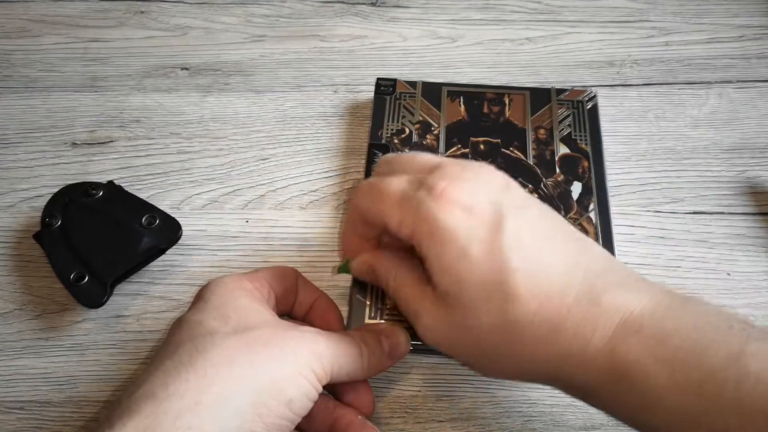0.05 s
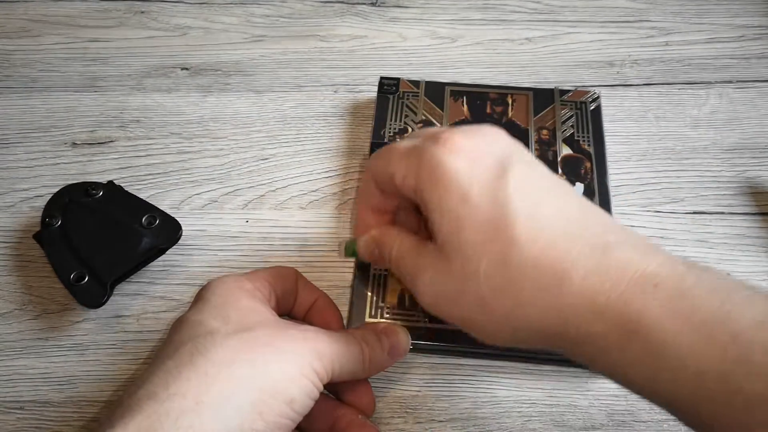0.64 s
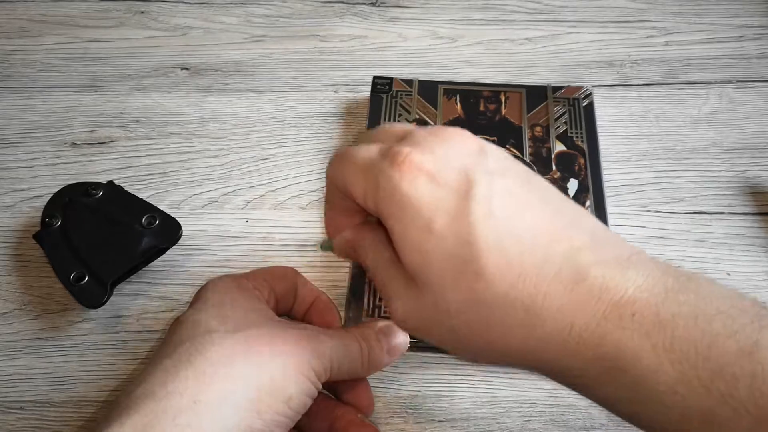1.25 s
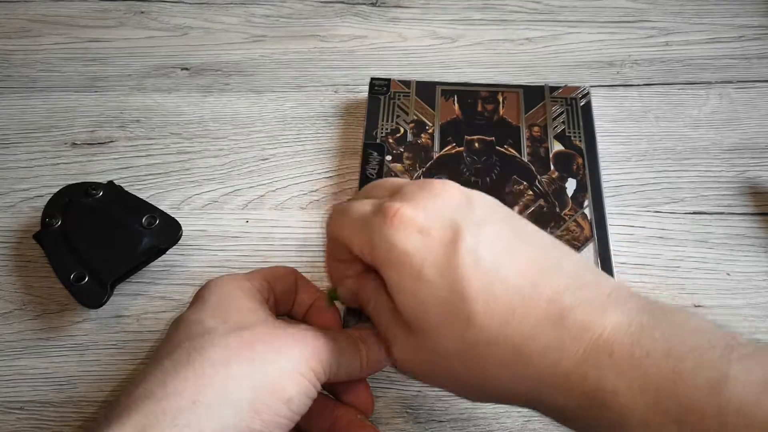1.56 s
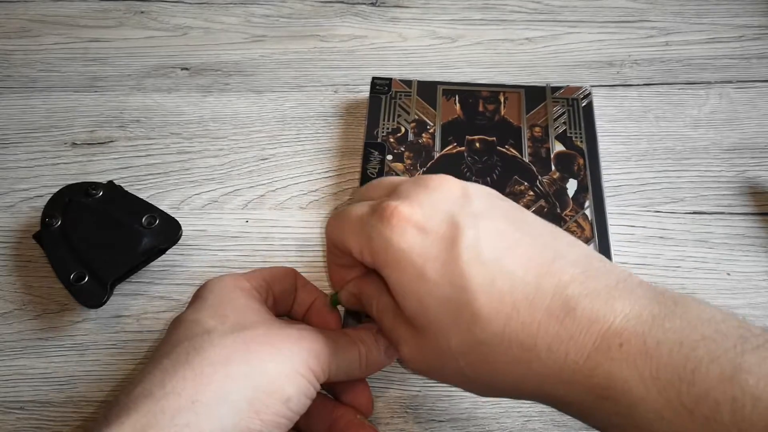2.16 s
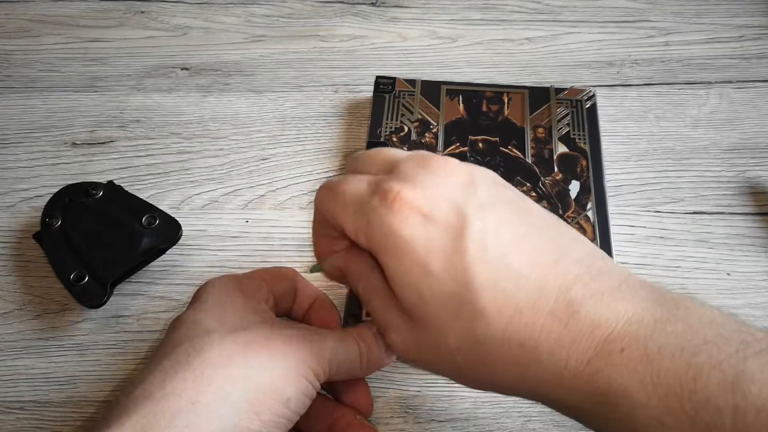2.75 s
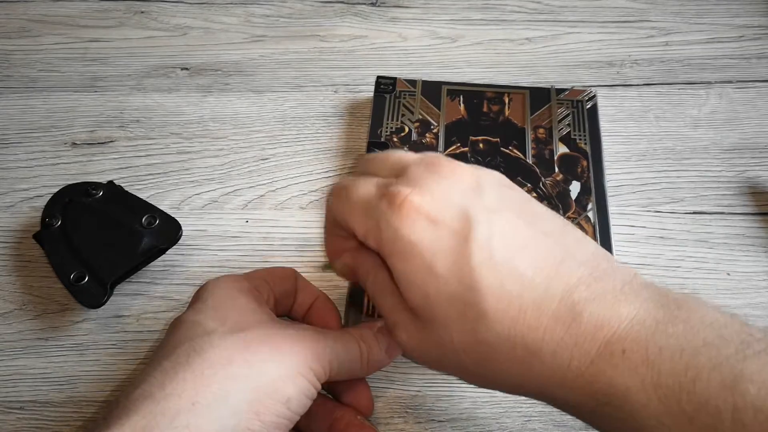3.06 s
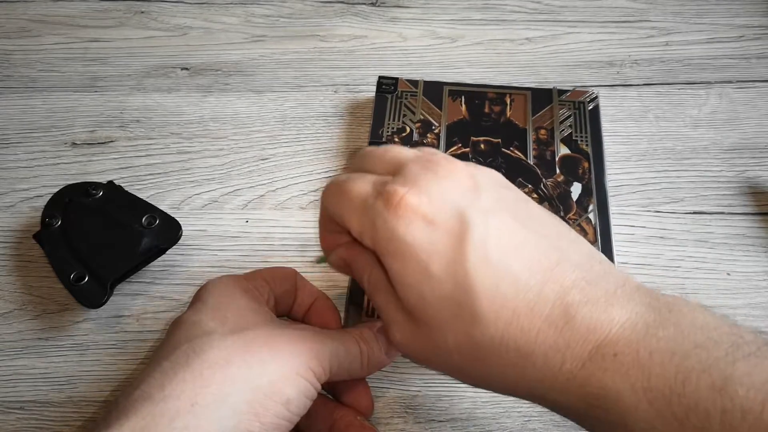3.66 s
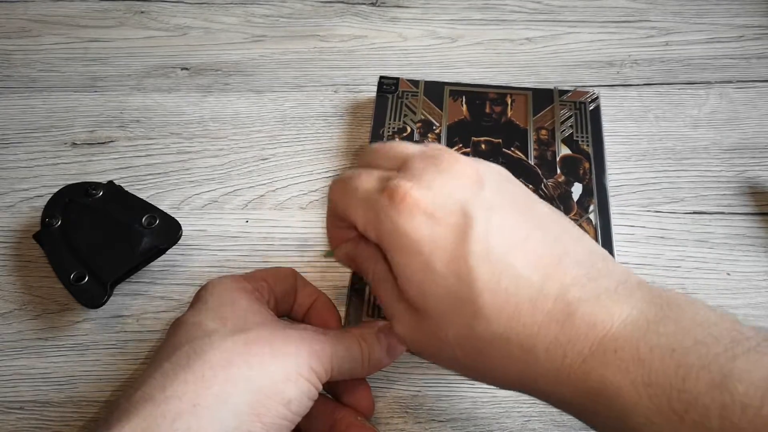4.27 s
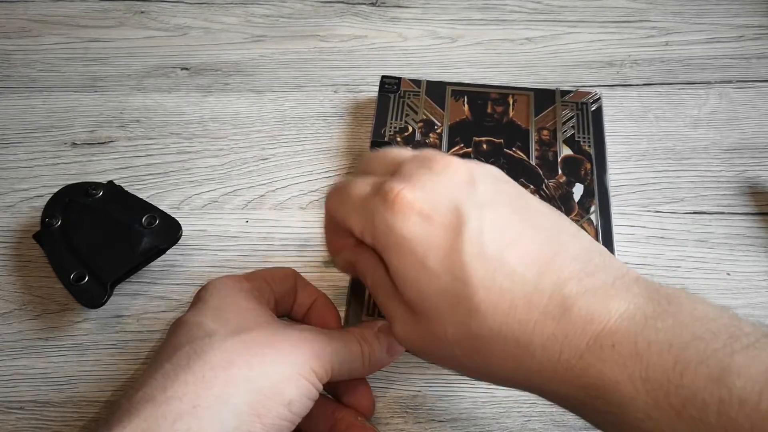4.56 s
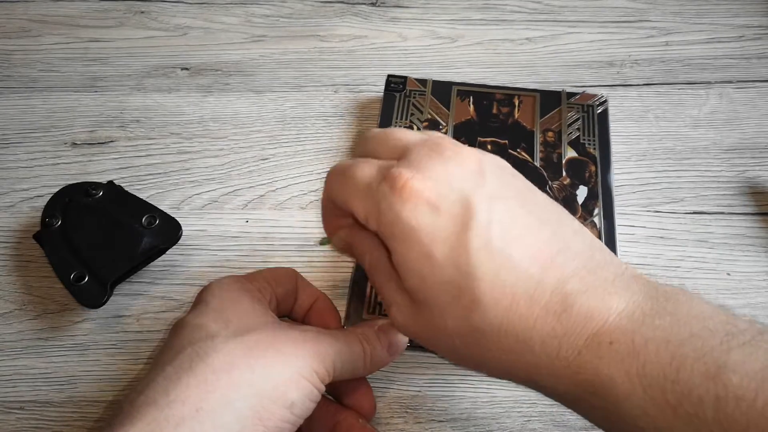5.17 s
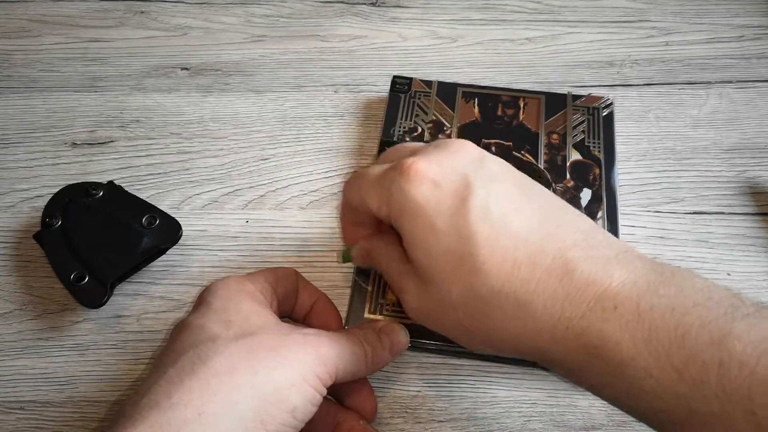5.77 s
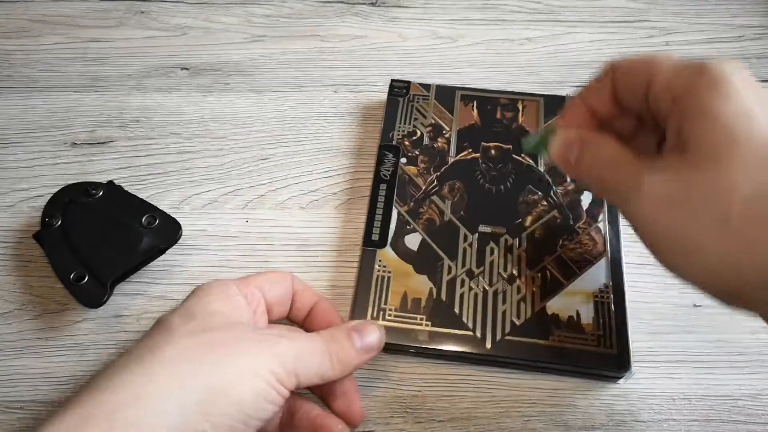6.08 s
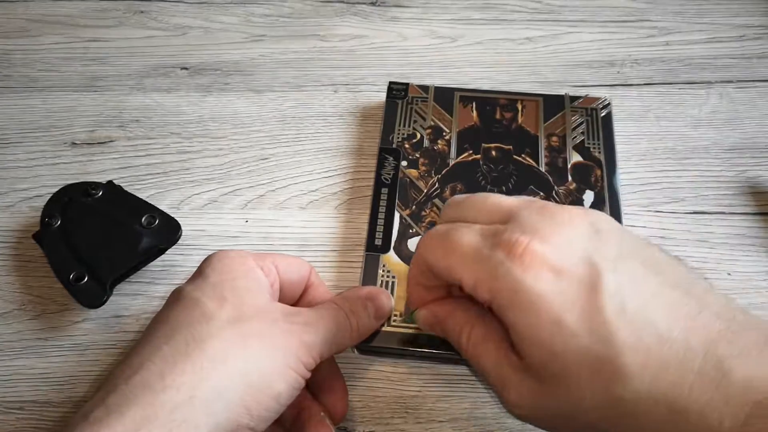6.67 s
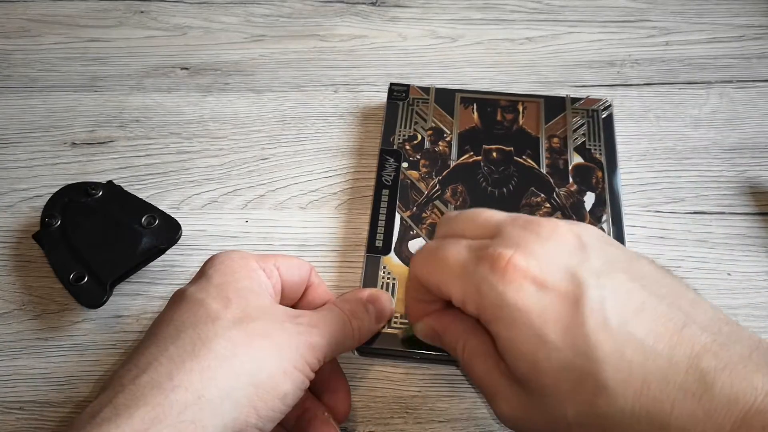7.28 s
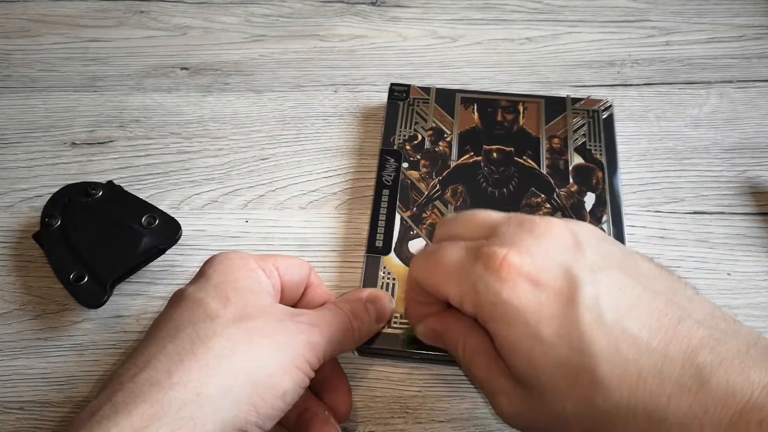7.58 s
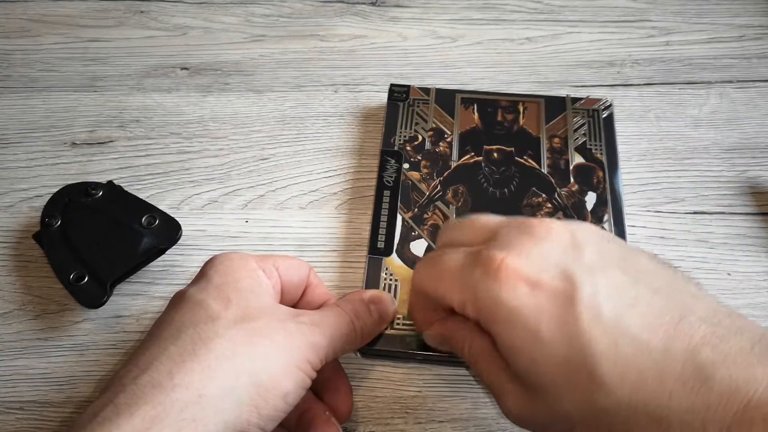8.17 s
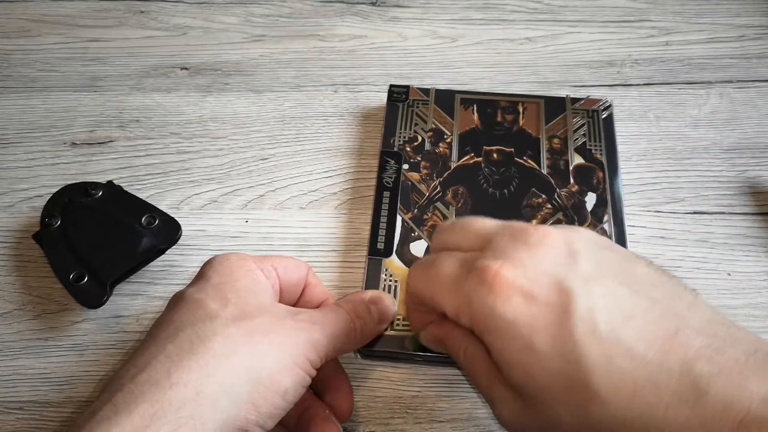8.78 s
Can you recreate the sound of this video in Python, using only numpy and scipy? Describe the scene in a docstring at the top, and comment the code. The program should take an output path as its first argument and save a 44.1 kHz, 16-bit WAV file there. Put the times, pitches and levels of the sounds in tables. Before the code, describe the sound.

A fingertip dabs a sticky scrap on a shrink-wrapped disc case lying on a table. Each dab lands with a faint tick and a dull thump, then pulls free with a crisp snap. The dabs start slowly, quicken to six or seven a second, stop for about a second, then resume with a slightly different ring, growing a little louder. It is heard close up, in stereo, in a small quiet room.

```python
"""Sticky little snaps and dull thumps, six or seven a second, close by and in stereo in a small room.
A fingertip dabs a sticky scrap on a shrink-wrapped disc case on a table, to lift glue off the film.
Each dab ticks as it lands and thumps through the table; then the scrap peels away and the film lets go
with a snap. The hand works along the edge of the case, pauses, and goes on in the face of the lid."""
import sys
import numpy as np
from scipy import signal
from scipy.fft import rfft, irfft, next_fast_len
from scipy.io import wavfile
from scipy.ndimage import uniform_filter1d

SR = 44100
rng = np.random.default_rng(int(sys.argv[2]) if len(sys.argv) > 2 else 0)


def store_wav(level_fs):
    """Save 16-bit WAV to argv[1]."""
    pcm = np.round(np.clip(np.atleast_2d(level_fs), -1, 1) * 32767)
    wavfile.write(sys.argv[1], SR, pcm.T.astype(np.int16))


N = 393813
MOVE_S = 6.5   # the hand is at the edge before this time and on the lid after it
SIZE, LEAD = 8192, 1024   # each short sound is built in SIZE samples, with time zero LEAD samples in
T = (np.arange(SIZE) - LEAD) / SR
HZ = np.maximum(np.fft.rfftfreq(SIZE, 1 / SR), 1)

# The finger comes down. Each row: time in seconds, relative level of the thump in dB.
PRESSES = [(.801, -58.5), (1.155, -40.5), (1.414, -39.5), (1.624, -36.5), (1.825, -38), (2.021, -40),
           (2.201, -43.5), (2.388, -41), (2.564, -38), (2.737, -39.5), (2.897, -35.5), (3.06, -36),
           (3.217, -36), (3.367, -38), (3.518, -41), (3.672, -39), (3.82, -38), (3.974, -36), (4.13, -37),
           (4.277, -38.5), (4.428, -38), (4.582, -36), (4.735, -38), (4.876, -37.5), (5.026, -38.5),
           (5.169, -37), (5.315, -40), (5.455, -48.5), (5.598, -48.5), (5.727, -43.5), (5.858, -40),
           (6.836, -48), (6.985, -38), (7.13, -42.5), (7.285, -34.5), (7.442, -37.5), (7.595, -40),
           (7.746, -35), (7.895, -39), (8.055, -36), (8.205, -34), (8.361, -32.5), (8.52, -31),
           (8.673, -31), (8.82, -32)]
# How the hand lands. Each row: time in seconds, hardness in dB, seconds from first touch to thump.
LANDING = [(1.15, -9, 0.013), (1.41, -6, .0115), (1.83, -7, 0.011), (2.2, -12.5, 0.017), (2.74, -8, 0.015),
           (2.9, -2, .011), (4.13, -5, .01), (4.6, -4, .012), (5.2, -5, 0.015), (5.55, 5, 0.017),
           (5.86, -3, 0.017), (6.84, -12.5, 0.018), (7.3, -4.5, 0.016), (8.2, -4, 0.012),
           (8.52, 5.5, 0.013), (8.82, 4.5, 0.014)]
# The tones at which the wrapped case rings when dabbed at its edge.
# Each row: pitch in Hz, width in Hz, relative level on the left in dB, the same on the right.
EDGE = [(366, 420, -19, -18), (756, 20, -15.5, -8), (1127, 163, -10, -11.5), (1330, 82, -13, -11),
        (2000, 580, -17.5, -9), (2640, 230, -1.5, -22.5), (2885, 130, -6, -1), (3955, 390, -15.5, -10),
        (5410, 2000, -16.5, -14.5), (5300, 470, -15.5, -18), (7140, 610, -6.5, -31.5),
        (9365, 330, -18.5, -6), (10050, 1100, -22, -15), (13750, 1500, -29.5, -30.5)]
# The scrap peels slowly. Each row: start in seconds, end in seconds, level of the crackle in dB,
# relative level of the opening tick in dB.
SLOW_PEELS = [(0.462, 0.537, -55, -54.5), (.975, 0.987, -47, -38), (1.254, 1.266, -52.5, -66.5),
              (1.49, 1.52, -41, -49.5), (1.679, 1.7, -53.5, -61.5), (6.8988, 6.909, -34, -38.5)]


def from_db(db):
    """Turn decibels into a factor to multiply by."""
    return 10 ** (np.asarray(db) / 20)


def unit(x):
    """Scale to an average energy of 1 per channel."""
    return x / np.sqrt(np.mean(np.sum(x ** 2, axis=-1)) + 1e-20)


def at_level(x, db, seconds):
    """Give a burst the energy of a sound of that level and length."""
    return unit(x) * from_db(db) * np.sqrt(seconds * SR)


def at_hz(points, hz):
    """Read a curve at these frequencies, with octaves evenly spaced."""
    points = np.array(points)
    return np.interp(np.log(np.maximum(hz, 1)), np.log(points[:, 0]), points[:, 1])


def at_time(curve, s):
    """Read every column of a curve at one moment."""
    times, *columns = np.transpose(curve)
    return [np.interp(s, times, column) for column in columns]


def resonances(modes):
    """A gain curve with a peak at each ringing tone; one curve for each level column."""
    modes = np.array(modes, float)
    peaks = (1 + ((HZ - modes[:, :1]) / modes[:, 1:2]) ** 2) ** -2
    return np.sqrt(from_db(modes[:, 2:].T) ** 2 @ peaks)


def all_round(gain):
    """Smooth a gain curve: summed over all directions, its peaks and dips even out."""
    log_hz = np.geomspace(100, SR / 2, num=512)
    power = np.array([np.interp(log_hz, HZ, side ** 2) for side in gain])
    power = uniform_filter1d(uniform_filter1d(power, size=34), size=20)
    return np.sqrt([np.interp(HZ, log_hz, np.abs(side)) for side in power])


def colour(x, gain):
    """Filter by a gain curve so that nothing sounds before its cause (minimum phase)."""
    cepstrum = irfft(np.log(gain + 1e-7))
    cepstrum[..., 1:SIZE // 2] *= 2
    cepstrum[..., SIZE // 2 + 1:] = 0
    return irfft(rfft(x) * np.exp(rfft(cepstrum)))


def even_out(x, share):
    """Flatten the chance peaks in a burst's spectrum (share 1 = fully), keeping its timing."""
    spectrum = rfft(x)
    return irfft(spectrum / (np.abs(spectrum) + 1e-3) ** share)


def two_ears(alike_hz, size=SIZE):
    """Stereo noise, the same on both sides in the bass and unrelated in the treble."""
    hz = np.fft.rfftfreq(size, 1 / SR)
    alike = 1 / (1 + (hz / alike_hz) ** 2)
    mid, side = rfft(rng.standard_normal((2, size)))
    return irfft(np.sqrt(1 + alike) * mid + np.sqrt(1 - alike) * side * [[1], [-1]], size)


def dying(t, t60):
    """Start at time zero and fade by 60 dB in t60 seconds; given -t, swell up to time zero."""
    return (t > 0) * np.exp(-np.log(1000) * np.abs(t) / t60)


def grains(per_s, spread_db):
    """Random clicks of uneven size."""
    clicks = (rng.random(SIZE) < per_s / SR) * rng.standard_normal(SIZE)
    return clicks * from_db(spread_db * rng.standard_normal(SIZE))


def add(out, burst, s):
    """Mix a burst in, with its time zero at s seconds."""
    start = int(round(s * SR)) - LEAD
    out[..., start:start + SIZE] += burst[..., :N - start]


def hush(level_db):
    """The steady low rumble and faint hiss of the room."""
    # The tone of the background. Each row: frequency in Hz, relative level in dB.
    hush_tone = [(12, -40), (20, 0.5), (96, -6.5), (123, -14), (198, -8.5), (301, -17), (388, -24.5),
                 (590, -32), (1370, -26.5), (1760, -25.5), (2750, -29), (4300, -35.5), (6910, -37.5),
                 (8410, -43), (16000, -47)]
    size = next_fast_len(N)
    gain = from_db(at_hz(hush_tone, np.fft.rfftfreq(size, 1 / SR)))
    noise = irfft(rfft(two_ears(alike_hz=700, size=size)) * gain, size)[:, :N]
    return at_level(noise, level_db, N / SR)


def room(x, first_echo_s, echo_db):
    """Separate echoes from the walls blur into a tail that fades band by band."""
    # The room's echo. Each row: frequency in Hz, relative level in dB, seconds to fade by 60 dB.
    bands = [(60, -22, 0.55), (133, -18, 0.99), (230, 0.5, 0.53), (393, -1.5, 0.12), (620, -4, 0.18),
             (1220, -3.5, 0.17), (2853, -7.5, 0.27), (5860, -8.5, 0.27), (9900, -10, 0.24),
             (15000, -13, 0.43)]
    t = np.arange(SR // 2) / SR - first_echo_s
    hz = np.fft.rfftfreq(len(t), 1 / SR)
    arrivals = rng.random((2, len(t))) < 900 / SR
    echoes = arrivals * rng.standard_normal((2, len(t))) * dying(t, t60=.05)
    echoes = rfft(echoes) * hz ** 2 / (hz ** 2 + 900 ** 2)   # small surfaces reflect only short waves
    walls = rfft(two_ears(alike_hz=453, size=len(t))) + from_db(echo_db) * echoes
    response = 0
    for k, (_, level_db, t60) in enumerate(bands):
        share = np.interp(np.log(hz + 1), np.log(np.array(bands)[:, 0]), np.arange(len(bands)) == k)
        band = irfft(walls * share, len(t)) * dying(t, t60)
        response += from_db(level_db) * unit(band) * np.sqrt(np.mean(share ** 2))
    return signal.fftconvolve(x, response, axes=1)[:, :N]


def slow_peels(swell_db):
    """A fine crackle of glue threads that grows as the pull tightens."""
    out, case = np.zeros((2, N)), all_round(resonances(EDGE))
    for start, end, level_db, _ in SLOW_PEELS:
        progress = T / (end - start)
        pull = (progress > 0) * (progress < 1) * from_db(swell_db * np.clip(progress, 0, 1))
        threads = unit(grains(per_s=1600, spread_db=8)) + unit(two_ears(alike_hz=1200))
        add(out, at_level(colour(threads * pull, case), level_db, seconds=end - start), start)
    return out


def contacts(creak_db):
    """The scrap ticks on the film, the case slaps the table, and the squeezed glue crackles faintly."""
    # The tone of the scrap touching the film. Each row: frequency in Hz, relative level in dB.
    touch_tone = [(410, -37), (700, -16), (1080, -7.5), (1760, -5), (2690, -1), (6190, -16.5), (7040, 1),
                  (8320, -17.5), (9330, -10), (15000, -36.5)]
    # The tone of the case slapping the table. Each row: frequency in Hz, relative level in dB.
    slap_tone = [(290, -35), (500, -12), (616, -14), (950, -7), (1380, -10), (3060, -12.5), (4400, -21),
                 (7270, -27.5), (8360, -30), (10000, -32.5), (14000, -55)]
    usual_press_db = -37.5
    out = np.zeros((2, N))
    for s, thump_db in PRESSES:
        slap_db, touch_db = (-41, -43.5) if s < MOVE_S else (-47, -48)
        extra_db = thump_db - usual_press_db   # a firmer press ticks and slaps louder
        _, early_s = at_time(LANDING, s)
        crinkle = unit(two_ears(alike_hz=1500)) + unit(grains(per_s=2500, spread_db=4))
        rise_and_fall = 0.087 * dying(-T, t60=0.0048) + dying(T, t60=0.008)
        touch = colour(crinkle * rise_and_fall, from_db(at_hz(touch_tone, HZ)))
        add(out, at_level(touch, touch_db + extra_db, seconds=0.0063), s - early_s)
        knock = unit(two_ears(alike_hz=1500) * dying(T, t60=0.043))
        squeeze = unit(grains(per_s=500, spread_db=4) * dying(T, t60=.2))
        slap = colour(knock + from_db(creak_db) * squeeze, from_db(at_hz(slap_tone, HZ)))
        add(out, at_level(slap, slap_db + extra_db, seconds=0.0079), s - .0052)
    return out


def thumps(push_s, ring_db, gain_db):
    """A soft push, shorter when the landing is hard: the table thumps as it is jolted, then rings."""
    # The tones at which the table rings. Each row: pitch in Hz, width in Hz, relative level in dB.
    table_modes = [(35.7, 6.1, 7), (62.5, 3, -25), (101.4, 8.2, 1.5), (117.5, 13, -2), (145.7, 6.4, 0),
                   (189, 20, -4.5), (263.3, 7.45, -8.5), (308.3, 44, -16.5), (397, 120, -10.5)]
    out, table = np.zeros((2, N)), resonances(table_modes)[0]
    for s, thump_db in PRESSES:
        hardness_db, _ = at_time(LANDING, s)
        phase = T / (push_s * from_db(-.22 * hardness_db))
        soft = np.exp(-phase ** 2 / 2)
        firm = np.exp(-(2.64 * phase) ** 2 / 2)   # the fingertip is squeezed firm at the push's peak
        acceleration = (1 - phase ** 2) * soft + 0.075 * (1 - (0.84 * phase) ** 2) * firm
        thump = unit(acceleration) + from_db(ring_db) * unit(colour(firm, table))
        add(out, at_level(thump, thump_db + gain_db, seconds=.05), s - .0008)
    return out


def bending(x, delay_s):
    """Waves bend the case: low tones travel slowly and arrive late (by delay_s at 1 kHz)."""
    return irfft(rfft(x) * np.exp(-4j * np.pi * delay_s * np.sqrt(1000 * HZ)))


def film_tone(db_per_octave, ring_db, top_db):
    """A gain curve that tilts a snap's treble and lifts or damps the film's ring and its very top."""
    octaves = np.log2(np.clip(HZ, 1300, 11000) / 1300)
    ring = at_hz([(1900, 0), (2400, 1), (3100, 1), (3900, 0)], HZ)
    top = at_hz([(10000, 0), (13000, 1)], HZ)
    return from_db(db_per_octave * octaves + ring_db * ring + top_db * top)


def releases():
    """List each parting of scrap and film: time in seconds, level in dB, peeling in dB, tone curve."""
    # The film lets go. Each row: time in seconds, relative level in dB.
    partings = [(.541, -34.5), (1.0039, -24.5), (1.2733, -24), (1.507, -23.5), (1.7157, -35),
                (1.9132, -26.5), (2.113, -25), (2.2833, -29), (2.4683, -24), (2.643, -24.5), (2.795, -28),
                (2.958, -23), (3.1238, -24), (3.2764, -25), (3.421, -27.5), (3.5707, -29.5), (3.7221, -25),
                (3.8709, -23), (4.0281, -26), (4.1818, -32.5), (4.1849, -27.5), (4.3374, -23),
                (4.4868, -23.5), (4.6391, -22), (4.7914, -23), (4.936, -23.5), (5.0767, -25), (5.22, -25),
                (5.3713, -27.5), (5.512, -30.5), (5.6449, -29), (5.7781, -25.5), (5.92, -23.5),
                (6.0464, -53.5), (6.133, -45), (6.9069, -39), (6.917, -34.5), (7.0594, -24.5),
                (7.1982, -26), (7.3575, -22.5), (7.5217, -24), (7.6699, -23), (7.8328, -25), (7.9752, -24),
                (8.127, -22.5), (8.277, -21), (8.4261, -20.5), (8.4368, -39), (8.5796, -20), (8.73, -19.5),
                (8.8764, -21)]
    # The film under the moving hand. Each row: time in seconds, brightness in dB per octave,
    # ring near 2.7 kHz in dB, top treble in dB, relative level of the peeling in dB.
    film = [(.54, 0, 0, 0, -11.5), (1.0, -0.8, -3, -2, -16), (1.27, -1.3, 5.5, 0, -16),
            (1.51, 0.1, -0.5, -5, -16), (2.47, -.5, 0, -0.5, -7.5), (3.12, -0.8, 2, -4, -13),
            (3.6, -0.2, -4, -1, -14), (4.3, 0, 1, -0.5, -25.5), (4.64, .7, -2, -3, -9.5),
            (5.22, -0.5, -3, 3.5, -13), (5.92, .6, -0.5, 0, -21.5), (7.06, -0.5, -2.5, -3, -19),
            (7.67, .5, -2.5, 0.5, -16), (7.83, -1.8, -1.5, -1, -16), (8.13, -0.3, -1, -2, -24),
            (8.43, -0.5, 1.5, -5, -16), (8.88, 1, 1, -6, -10)]
    weak_db, gluey_from_s, gluey_to_s = -29, 2.72, 5.58
    rows = []
    for s, level_db in partings:
        tear_luck, ring_luck, bright_luck = rng.standard_normal(3)   # no two dabs hit quite one spot
        brightness, ring_db, top_db, peel_db = at_time(film, s)
        dulling = np.clip(.6 * (weak_db - level_db), 0, 4.5)   # a weak snap is slower, so duller
        tone = film_tone(brightness - dulling + 0.29 * bright_luck, ring_db + 1.6 * ring_luck, top_db)
        rows.append((s, level_db, peel_db, tone))
        if gluey_from_s < s < gluey_to_s:   # here a first tear comes just before each snap
            rows.append((s - .0047, level_db - 12 + 4.5 * tear_luck, peel_db, tone))
    # a slow peel opens with a thin, ringing, sudden tick
    thin, tick_peel_db = film_tone(db_per_octave=3, ring_db=9, top_db=0.5), -24.5
    return rows + [(s, tick_db, tick_peel_db, thin) for s, _, _, tick_db in SLOW_PEELS]


def snaps(rows, modes, hollow_hz, right_lag_s, left_db, flutter_t60, flutter_gain_db, peel_gain_db,
          gain_db):
    """Glue threads part ever faster, then the film springs back and shakes the case."""
    out = np.zeros((2, 2, N))   # one stereo sound for the microphone, one for the walls
    hollow = 1 - 0.88 / (1 + ((HZ - hollow_hz) / 80) ** 2)   # a pitch at which the case barely moves
    case = resonances(modes) * hollow * from_db([[left_db], [0]])
    radiated = all_round(case)
    shared_part = two_ears(alike_hz=1200)
    usual_peel_db = -12.5
    for s, level_db, peel_db, tone in rows:
        threads = unit(grains(per_s=5000, spread_db=4) * dying(-T, t60=.028))
        # the film flutters a little differently each time, and more after a longer peel
        flutter = unit((0.58 * shared_part + two_ears(alike_hz=1240)) * dying(T, t60=flutter_t60))
        flutter_db = 0.22 * (peel_db - usual_peel_db) + flutter_gain_db
        last_threads = unit(grains(per_s=8300, spread_db=-0.5) * dying(T + .0006, t60=0.0024))
        release = unit((T == 0) + 0.64 * last_threads)
        force = release + from_db(peel_db + peel_gain_db) * threads + from_db(flutter_db) * flutter
        # the pull of the scrap stretches the film and shifts its ringing tones a little
        stretch = 1 + .013 * rng.standard_normal()
        stretched = np.array([np.interp(HZ / stretch, HZ, side) for side in case])
        # the walls hear the whole film at once, so its chance peaks count for less there
        forces = np.array([unit(even_out(force, share=0.098)), unit(even_out(force, share=0.84))])
        ringing = colour(forces, np.array([stretched, radiated]) * tone)
        (left, right), to_walls = bending(ringing, delay_s=0.000893)
        to_microphone = [left, np.interp(T - right_lag_s, T, right)]
        snap = at_level(np.array([to_microphone, to_walls]), level_db + gain_db, seconds=0.012)
        add(out, snap, s - .0003)
    return out


def scene():
    """Dabs at the edge, then in the face of the lid, heard in the room."""
    # The tones at which the wrapped case rings when dabbed in the face of the lid.
    # Each row: pitch in Hz, width in Hz, relative level on the left in dB, the same on the right.
    face = [(347, 106, -10, -8.5), (776, 260, -23, -8), (1260, 287, -5.5, -4.5), (1777, 59, -1, 1.5),
            (2535, 424, -1, 0.5), (3240, 2200, -16, -47.5), (3730, 206, -15, -2), (4826, 395, -1, -4.5),
            (5720, 210, -3.5, -2), (7550, 680, -1, -6.5), (10200, 2000, -13.5, -19), (9920, 1660, -32, -3),
            (13300, 1200, -18, -10)]
    rows = releases()
    at_edge = snaps([row for row in rows if row[0] < MOVE_S], EDGE,
                    hollow_hz=593, right_lag_s=.00007, left_db=1.4,
                    flutter_t60=0.019, flutter_gain_db=1.5, peel_gain_db=4.5, gain_db=0.84)
    in_face = snaps([row for row in rows if row[0] > MOVE_S], face,
                    hollow_hz=658, right_lag_s=.00001, left_db=1.5,
                    flutter_t60=0.025, flutter_gain_db=4.0, peel_gain_db=1.5, gain_db=-0.02)
    snap, snap_to_walls = at_edge + in_face
    presses = thumps(push_s=0.0017, ring_db=5.5, gain_db=0.82) + contacts(creak_db=-19)
    handling = presses + slow_peels(swell_db=20.5)
    echoes = room(snap_to_walls + handling, first_echo_s=.008, echo_db=22)
    return snap + handling + echoes + hush(level_db=-62.5)


def record(dry):
    """Cut the treble above 15.8 kHz."""
    return signal.sosfilt(signal.ellip(10, .2, 80, 15800, fs=SR, output="sos"), dry)


dry = scene()
out = record(dry)
store_wav(out)
```